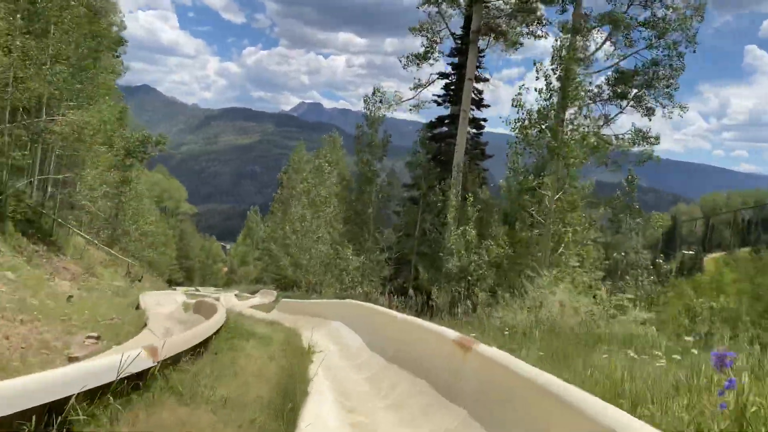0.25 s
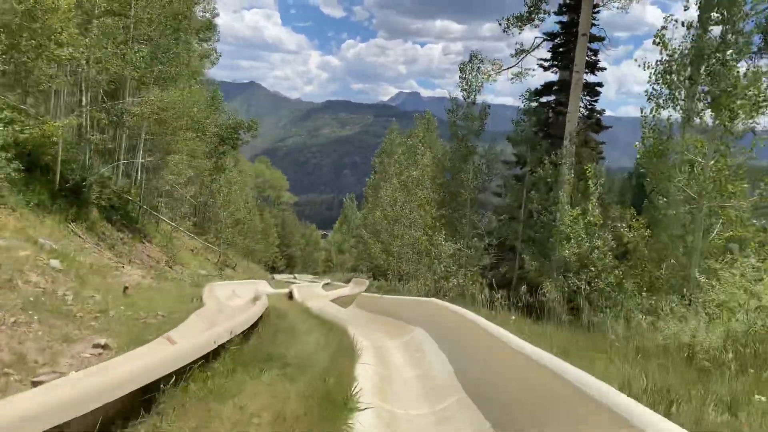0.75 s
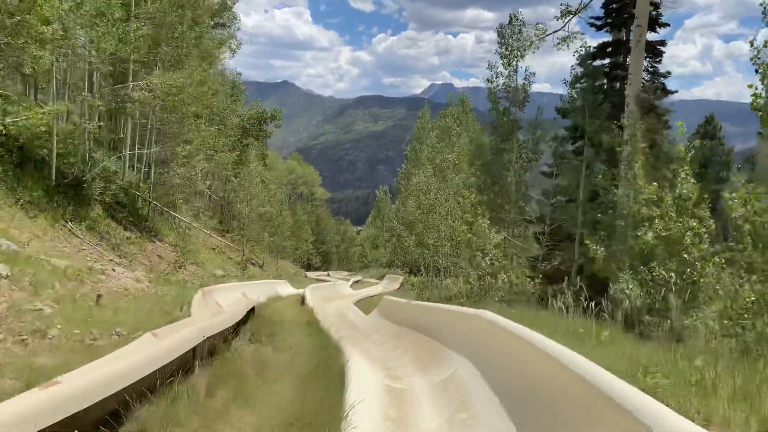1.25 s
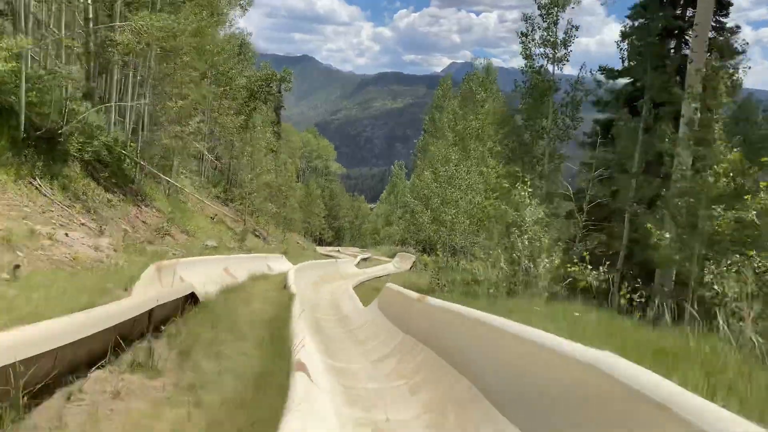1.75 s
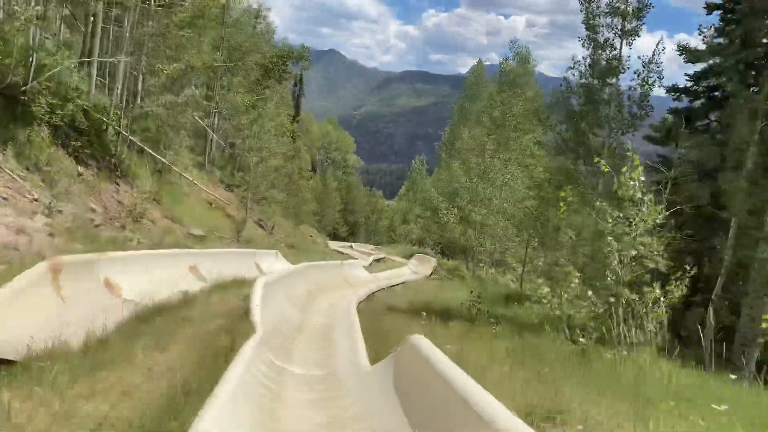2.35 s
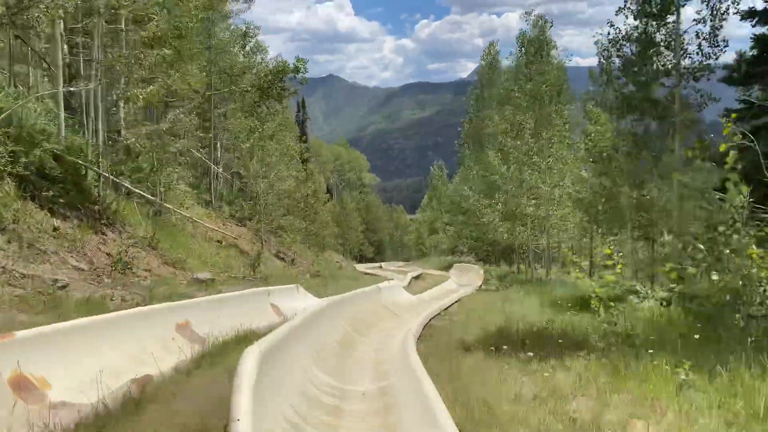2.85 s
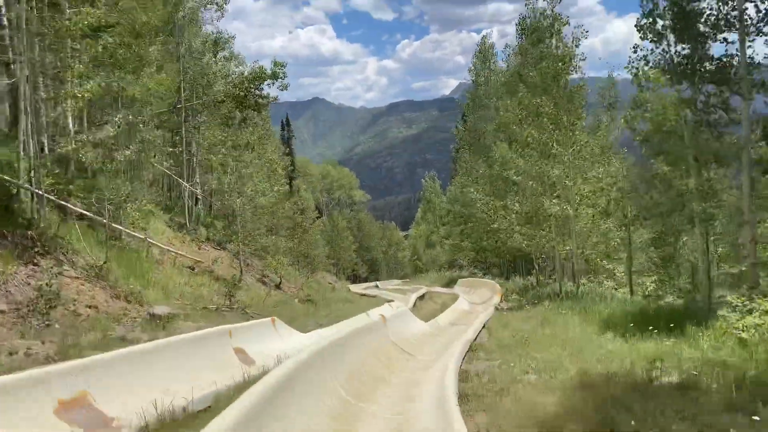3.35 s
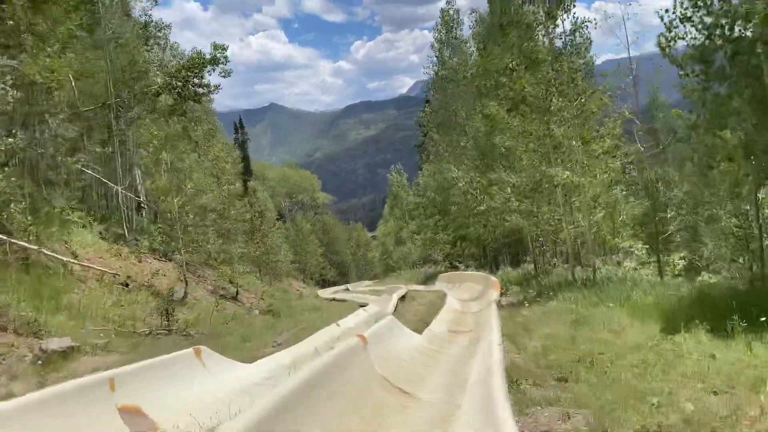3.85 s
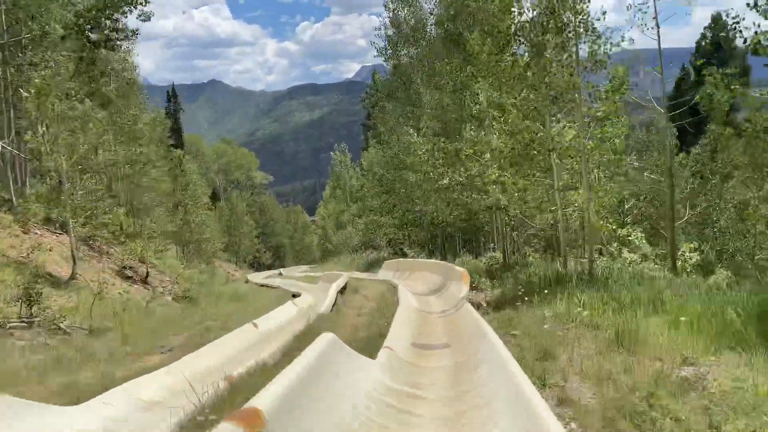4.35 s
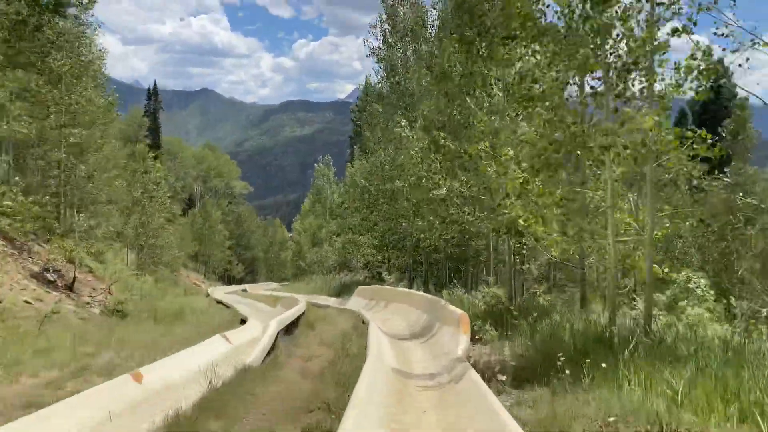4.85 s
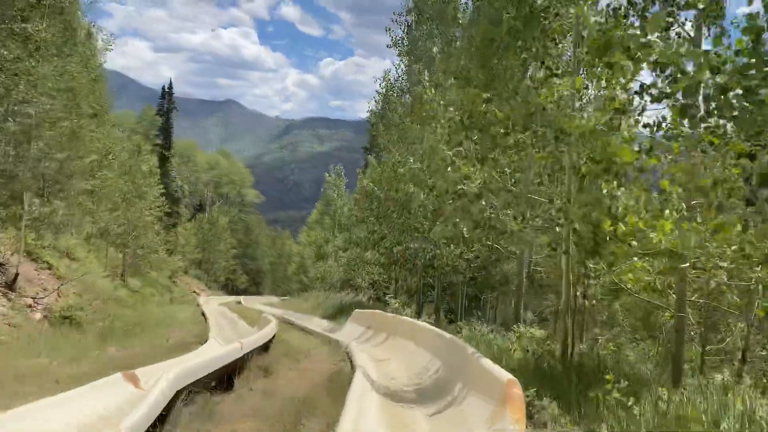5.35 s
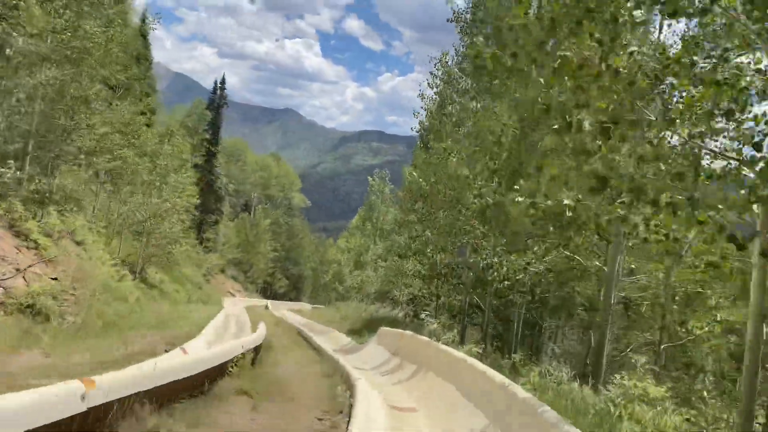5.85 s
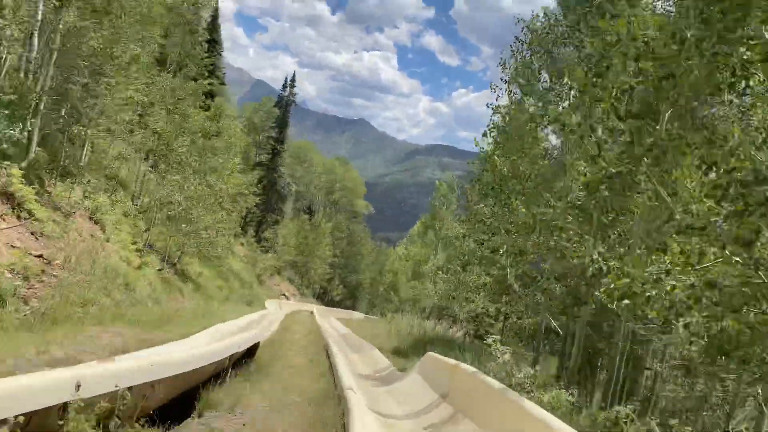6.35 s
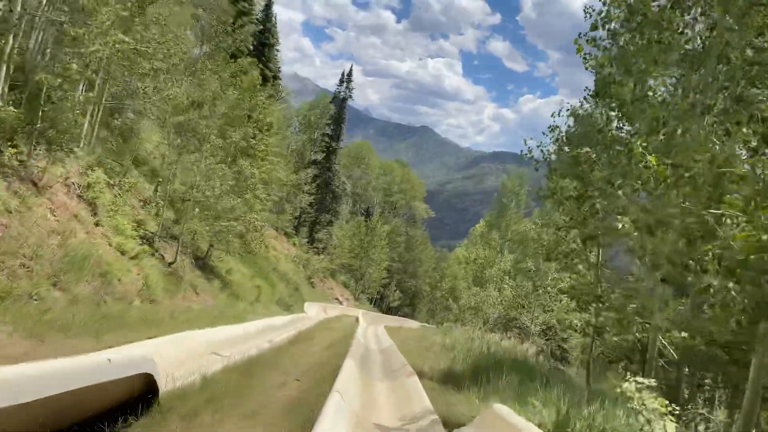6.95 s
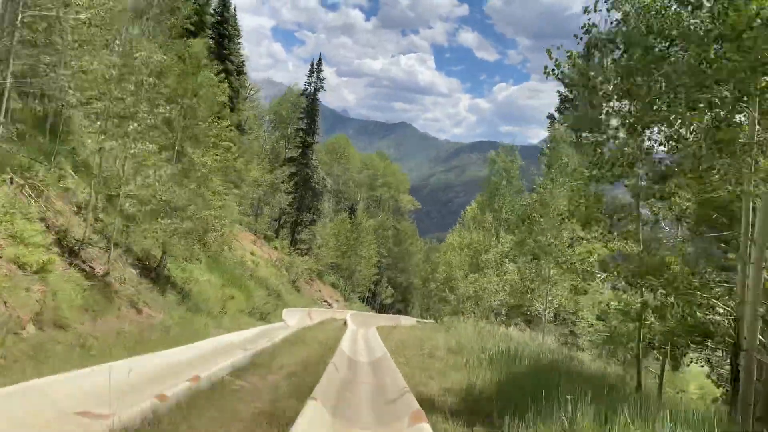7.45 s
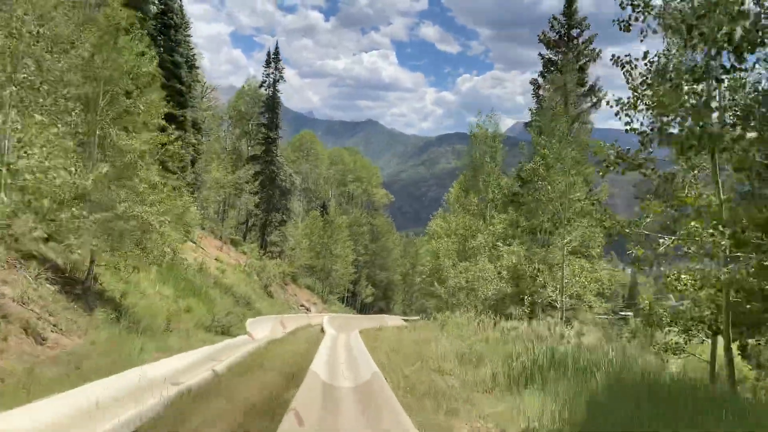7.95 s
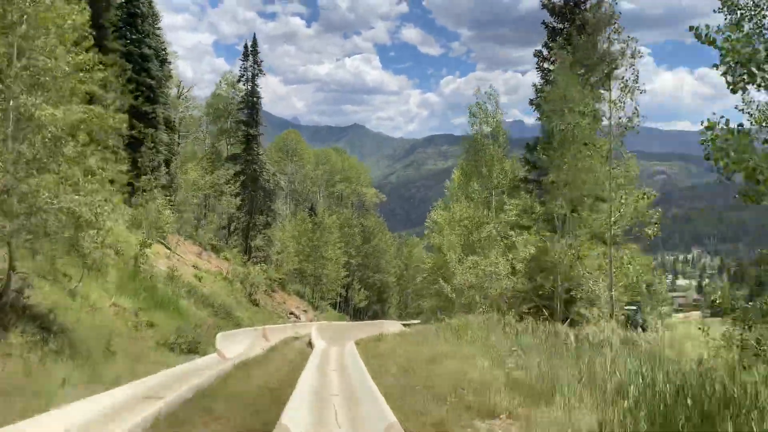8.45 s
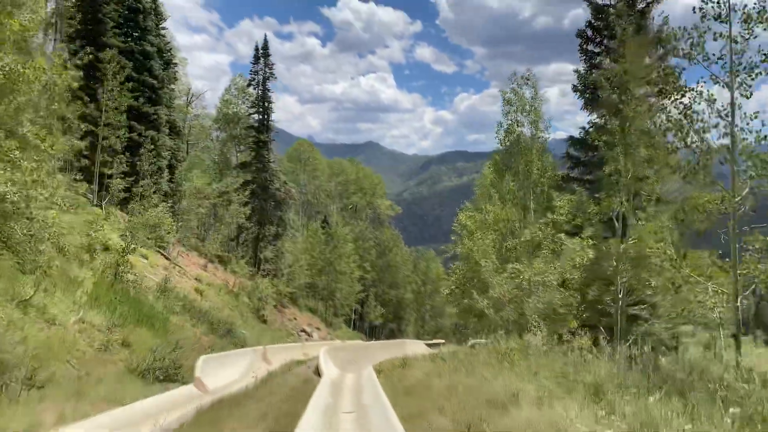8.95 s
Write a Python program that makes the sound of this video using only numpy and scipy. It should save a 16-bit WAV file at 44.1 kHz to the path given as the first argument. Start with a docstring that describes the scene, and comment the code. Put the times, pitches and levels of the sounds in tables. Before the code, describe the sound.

Close, continuous rolling rumble of a wheeled sled in a hard chute, broken by clacks, deep thumps, brief scrapes and faint hiss.

```python
"""A wheeled plastic sled rumbles down a trough track: track grain drives resonances of trough, tub and frame,
and uneven wheel rims add a drone of harmonics that climbs with the turning rate.
Seams, knocks and bumps are bursts of chattering contacts rung through the same parts, with rattles between.
Short accents sit on top: low swells, scrapes, seat tocks, fitting clinks and grit snaps.
Wheel hiss and rushing air are flickering bands of noise; a limiter holds the peaks."""
import sys
import numpy as np
from scipy import signal
from scipy.io import wavfile
from scipy.ndimage import uniform_filter1d, minimum_filter1d

SR = 44100
rng = np.random.default_rng(int(sys.argv[2]) if len(sys.argv) > 2 else 0)


def store_wav(level_fs):
    """Save 16-bit WAV to argv[1]."""
    pcm = np.round(np.clip(np.atleast_2d(level_fs), -1, 1) * 32767)
    wavfile.write(sys.argv[1], SR, pcm.T.astype(np.int16))


N = 405715

# Tables of resonances and spectra hold relative levels; layer and blow levels are before trims.
# rolling on plain track: t/s, trough boom level/dB, tub drumming level/dB, frame clatter level/dB
ROLLING_LEVELS = [(0.0, -34, -30, -29), (0.25, -33.5, -39, -31.5), (0.75, -32, -31, -27.5),
                  (1.08, -26, -29, -29), (1.85, -25.5, -31, -29.5), (2.25, -19.5, -26, -31),
                  (2.72, -34, -35.5, -30), (2.98, -21, -25.5, -25), (3.2, -30, -24.5, -27.5),
                  (3.45, -23.5, -25.5, -21), (4.05, -27.5, -30.5, -31.5), (4.6, -25.5, -18, -24.5),
                  (5.65, -23.5, -17.5, -26), (6.12, -25.5, -19.5, -23.5), (6.45, -19.5, -17, -23.5),
                  (7.2, -28, -19, -25), (7.88, -24.5, -16, -23), (8.13, -31.5, -17, -25.5),
                  (8.5, -21, -17, -23.5), (9.2, -26, -15, -26)]
# treble bed: t/s, wheel hiss level/dB, rushing air level/dB
TREBLE_LEVELS = [(0.0, -39.5, -62.5), (0.8, -39.5, -61.5), (0.92, -40, -66.5), (1.25, -40, -61.5),
                 (2.5, -38, -62), (2.7, -39, -67), (3.7, -38.5, -62.5), (4.5, -43, -64.5), (5.2, -43, -70),
                 (5.65, -43.5, -69), (6.45, -38.5, -61), (7.15, -37.5, -63.5), (8.2, -43, -70),
                 (9.2, -41, -68.5)]
BOOM_TRIM_DB, DRUM_TRIM_DB, CLATTER_TRIM_DB, HISS_TRIM_DB, AIR_TRIM_DB = 0, 1, -1.5, -1, 11
# wheels: t/s, turning rate/(turns per s), drone level over drumming/dB, tub brightness/(dB per octave)
WHEELS = [(0, 18.7, -8.5, 11), (1.4, 18.8, 2.5, 1), (2.3, 20.7, -7.5, -0.5), (3.4, 21.2, -3, 6),
          (4.3, 21.2, -14.5, -3.5), (5.2, 22.6, -5.5, -4), (6.5, 23.1, -10, -3.5), (7.5, 23.0, -4.5, -2),
          (8.6, 24.2, -2, 4), (9.2, 22.4, 4.5, -0.5)]
# unevenness of the wheel rims: multiple of the turning rate (rounded for the tone), level/dB
RIM_HARMONICS = [(5, -3.5), (7, -8.5), (8, -3), (9, 2), (11, -11.5), (16, -9.5), (19, -2), (20, -4.5),
                 (21, -3.5), (22, -7)]
# the sled leans in the bends: t/s, rumble left minus right level/dB
LEAN_BALANCE = [(0.5, 1.5), (2.5, -3.5), (4.6, -4), (5.3, 1.5), (6.2, 0.5), (7.2, 0), (9.2, -1.5)]
# the bass draws to the centre below this pitch: t/s, f/Hz
BASS_CENTRE = [(1.3, 26), (1.8, 65), (2.1, 288), (2.6, 510), (4.6, 425), (5.1, 295), (5.6, 170), (6.1, 105),
               (7.0, 45)]

# rough track: start t/s, length t/s, rise of drumming level/dB, rise of clatter level/dB
ROUGH_STRETCHES = [(0.28, 0.193, 16, 7), (0.487, 0.12, 10.5, 6.5), (1.291, 0.31, 5, 4.5),
                   (2.044, 0.12, 6, 3), (2.425, 0.41, 5, 3.5), (4.128, 0.21, 12.5, 8.5),
                   (4.364, 0.061, 8.5, 3), (4.74, 0.74, 3, 2), (5.853, 0.17, 3, 4.5), (6.736, 0.19, 2, 1),
                   (7.19, 0.19, 5.5, 6), (7.85, 0.095, 3.5, 3)]
# the sled goes light over a crest and the rolling drops: start t/s, length t/s, drop in level/dB
LIGHT_CRESTS = [(0.883, 0.033, 5), (1.76, 0.059, 5), (2.117, 0.042, 8), (3.181, 0.059, 5.5),
                (5.731, 0.016, 5), (6.068, 0.052, 5), (8.209, 0.075, 3.5)]
STRETCH_ATTACK_S, STRETCH_RELEASE_S = 0.012, 0.028  # shared by rough stretches and crests
BOOM_FOLLOWS, HISS_FOLLOWS, AIR_FOLLOWS = 0.48, 0.69, 0.19  # shares of the clatter's rise or drop

# resonances of the track's trough: f/Hz, width f/Hz, level/dB
TROUGH_MODES = [(60.7, 20, 3.5), (82.5, 29.4, 8.5), (108.7, 26.8, 5)]
# resonances of the sled's tub: f/Hz, width f/Hz, level/dB
TUB_MODES = [(154.2, 33, 1.5), (217.3, 54.2, 4), (249.4, 60, -5.5), (348.7, 61.5, 0.5), (387.2, 93, -4),
             (504, 235, -12.5)]
# broad resonances of the frame: f/Hz, width f/Hz, level/dB
FRAME_MODES = [(559, 166, 12), (741.6, 180, 13.5), (908, 246, 9.5), (1127, 394, -0.5), (1638, 304, 3.5),
               (1900, 280, -10), (2130, 880, -13)]
# narrow frame resonances, singing after a knock or a wheel scuff: f/Hz, width f/Hz, level/dB
SCUFF_MODES = [(741, 62, 0), (848, 43, 1.5), (936, 29, -7), (1099, 56, -2), (1250, 110, -6),
               (1526, 70, -7.5), (1730, 52, -22), (1874, 76, -8.5), (2132, 103, -13)]
SCUFF_DB = -5.5  # relative to the grain in the clatter
# resonances of the axles: f/Hz, width f/Hz, level/dB
AXLE_MODES = [(2700, 450, 1), (3550, 700, 2), (4700, 1400, -4.5), (6400, 2600, -11), (10500, 4000, -22)]
# a hollow in the rolling sound: depth 0-1 at the slowest speed, depth lost per added turn per s
HOLLOW_HZ, HOLLOW_WIDTH_HZ, HOLLOW_DEPTH, HOLLOW_FILLS = 563, 100, 0.78, 0.31

# the sled knocks against the trough: t/s, clatter level/dB, tick level/dB, thump level/dB,
# rattling time t/s, brightness/(dB per octave)
TROUGH_KNOCKS = [(.29, -19.5, -35, -23.5, 0.016, -5), (.32, -16, -30, -14.5, 0.018, -2),
                 (.399, -15.5, -27.5, -24, 0.011, 2), (.433, -19, -42, -24, .004, 3),
                 (.549, -13, -31, -22, 0.017, -3), (.674, -24.5, -38.5, -49, 0.012, 2),
                 (.857, -18, -41, -23, 0.0093, -6), (1.346, -17.5, -46, -22, 0.0064, -10),
                 (1.358, -18.5, -35, -22, 0.03, 1), (1.657, -9.5, -39, -13, 0.029, -9),
                 (1.669, -10.5, -22.5, -13, 0.022, 5), (2.213, -12.5, -31, -14, 0.073, 2),
                 (2.626, -4, -29, 0, 0.012, -2.5), (3.237, -23, -45, -27, 0.0059, -2),
                 (3.315, -15, -30, -9.5, 0.02, 2), (3.426, -25, -47, -26, 0.015, 7),
                 (3.748, -22.5, -32, -20, .005, 4), (3.848, -22, -31, -10, 0.0046, 11),
                 (3.859, -12.5, -27, -9.5, 0.048, 0.5), (4.18, -12.5, -28, -16, 0.0057, -2),
                 (4.333, -20, -33, -10, 0.016, 5), (4.795, -15, -27.5, -18, 0.009, 0),
                 (5.318, -14, -31, -13, 0.029, 8), (6.297, -26, -43, -39, 0.0081, 12),
                 (6.543, -22, -41, -30, 0.011, 0), (6.773, -20, -44, -27, 0.019, -4),
                 (6.927, -14, -41, -18, 0.022, -8), (7.286, -11, -39, -11, 0.013, -7),
                 (7.312, -19, -46, -23, 0.017, -4), (8.35, -22, -39.5, -16, 0.012, 5),
                 (8.39, -14, -31.5, -20, 0.018, 4), (8.867, -17.5, -54, -31, 0.011, -2)]
# track seams under the front wheels, then the rear: t/s, clatter level/dB, tick level/dB,
# thump level/dB, rear minus front level/dB
TRACK_SEAMS = [(.99, -22.5, -46, -23.5, -12), (1.486, -10, -27, -15, -8), (2.196, -15, -22.5, -10.5, 1),
               (2.711, -20, -31, -13, -5.5), (3.786, -20.5, -28.5, -17.5, -8),
               (6.362, -13, -30, -10.5, -2.5), (7.224, -26, -44, -10, -17), (7.362, -16.5, -33, -16.5, 1),
               (7.842, -24, -39.5, -16.5, 3.5)]
REAR_LAG_S, SEAM_RATTLE_S = .059, 0.015
GRAZE_LEAD_S, GRAZE_DB = .011, -14.5  # a light graze leads every clack, this much under the listed clatter
CLACK_TRIM_DB, RING_TRIM_DB, TICK_TRIM_DB = -3.5, -11, -3
# soft bumps that shake the whole sled: t/s, trough boom level/dB, tub drumming level/dB
SOFT_BUMPS = [(0.335, -31, -19.5), (0.559, -18.5, -17.5), (1.5, -21, -12), (1.557, -18, -17.5),
              (1.688, -7, -15.5), (2.251, -5, -13), (2.905, -23, -38), (2.96, -20, -22), (3.876, -7.5, -7),
              (4.132, -21, -11.5), (4.226, -25, -9.5), (4.285, -27, -12.5), (4.766, -34, -12),
              (4.84, -28, -15), (4.942, -22, -10), (5.033, -24, -17.5), (5.165, -16.5, -15),
              (5.799, -29, -17.5), (5.966, -32, -10.5), (6.025, -26, -19.5), (6.458, -15.5, -23),
              (6.845, -38, -9.5), (7.0, -21, -16.5), (7.426, -18.5, -27)]
THUMP_BOOM_DB, DRUM_BLOW_TRIM_DB = -12.5, -0.94  # thump reaching the trough; trim of all drum blows
THUMP_S, BUMP_S = 0.019, 0.023  # shaking times
# rattles: rate at full speed, level relative to the untrimmed clatter, random spread, decay
RATTLES_PER_S, RATTLE_DB, RATTLE_SPREAD_DB, RATTLE_S = 12, -6, 1.5, 0.0032

# low tones swell under the wheels, from the track or the turning rims:
# start t/s, length t/s, first f/Hz, last f/Hz, level/dB
LOW_SWELLS = [(4.2, 0.18, 275, 241.2, -16.5), (4.78, 0.55, 194.8, 155.2, -17),
              (5.29, 0.16, 240.3, 214.3, -19), (5.501, .28, 111.3, 109.6, -22),
                (8.41, 0.8, 480, 461.3, -24.5)]
SWELL_WIDTH, SWELL_EDGE_S = .19, 0.043  # width as a share of the first pitch; time to rise and to fall
# runners scrape the trough wall: start t/s, length t/s, first f/Hz, last f/Hz, level/dB
WALL_SCRAPES = [(0.503, 0.055, 1650, 1800, -26.5), (0.791, .06, 1346, 1134, -36),
                (.96, 0.05, 1800, 1710, -36.5), (1.049, 0.079, 709, 733, -30),
                (1.252, 0.053, 762, 822, -32), (2.018, 0.092, 765, 907, -32),
                (2.909, 0.049, 1920, 2040, -34), (2.999, .11, 1100, 1050, -36),
                (3.435, 0.1, 1640, 1810, -34), (3.856, 0.052, 2310, 2200, -25.5),
                (6.724, 0.11, 1600, 1660, -34), (6.763, 0.13, 776, 722, -28)]
SCRAPE_WIDTH, SCRAPE_RELEASE_S = 0.15, 0.022  # width as a share of the first pitch; fade at the end
SCRAPE_CATCHES_PER_S, SCRAPE_CATCH_DB = 197, 6.5  # the runner catches unevenly as it slides
# hollow tocks of the seat shell: t/s, level/dB
SEAT_TOCKS = [(4.329, -20.5), (5.319, -16), (8.391, -21)]
# resonance of the seat shell: f/Hz, width f/Hz, level/dB
SEAT_MODES = [(622, 106, 0)]
# a loose metal fitting hits its stop: t/s, knock of the stop level/dB, ring of the fitting level/dB
FITTING_CLINKS = [(.434, -32, -54), (.538, -27, -56), (1.669, -23, -38), (2.198, -24, -39),
                  (2.255, -20, -35), (2.773, -35, -37), (3.317, -25.5, -32), (3.869, -29, -51),
                  (6.425, -33, -47), (8.393, -23.5, -48), (8.867, -26, -33)]
# resonances of the stop: f/Hz, width f/Hz, level/dB
STOP_MODES = [(1690, 250, 2.5), (2130, 330, -4.5)]
# resonance of the loose fitting: f/Hz, width f/Hz, level/dB
FITTING_MODES = [(4630, 780, 18)]
# bits of grit crack under a wheel: t/s, level/dB
GRIT_SNAPS = [(1.063, -43), (1.546, -39), (1.556, -38), (2.254, -33), (3.237, -48), (3.847, -34),
              (3.858, -37), (5.289, -40), (5.369, -48), (5.4, -44), (7.336, -45)]
# resonances of the cracking grit: f/Hz, width f/Hz, level/dB
SNAP_MODES = [(6050, 6100, 3.5), (10600, 3800, -4)]

# spectrum of the wheel hiss: f/Hz, level/(dB per Hz)
HISS_SPECTRUM = [(2000, 8), (2600, 1), (3500, 2.5), (4800, -0.5), (6200, -4), (8000, -10), (10000, -42),
                 (14000, -37)]
# spectrum of the rushing air: f/Hz, level/(dB per Hz)
AIR_SPECTRUM = [(4000, -12), (7500, -3), (10500, 0), (12000, -1), (13500, -15), (16000, -13)]
# stereo width by pitch: f/Hz, left-right likeness
STEREO_LIKENESS = [(60, -0.15), (300, 0.27), (560, -0.37), (800, 0.11), (1200, 0.67), (1750, 0.29),
                   (2600, -0.85), (3500, -0.23), (4600, 0.57), (6000, -0.37), (11000, 0.24)]
# stereo balance by pitch: f/Hz, left minus right level/dB
STEREO_BALANCE = [(350, 0), (600, 2), (1000, -3), (1400, -2), (2100, -4), (3000, -0.5), (4800, 2),
                  (8000, 1), (11000, 0)]
CUTOFF_HZ = 16700


def from_db(db):
    """Decibels to gain."""
    return np.exp(np.asarray(db) * (np.log(10) / 20))


def rms_one(x):
    """Scale to unit power."""
    return x / np.sqrt(np.mean(x ** 2) + 1e-20)


def in_time(rows):
    """Each column of a curve at every sample."""
    s, *columns = np.transpose(rows)
    return [np.interp(np.arange(N) / SR, s, c) for c in columns]


def at_hz(points, hz):
    """Read a spectrum on a log-frequency axis."""
    point_hz, values = np.transpose(points)
    return np.interp(np.log(hz), np.log(point_hz), values)


def drift(rate):
    """Slow chance with spread 1, wandering faster at a higher rate."""
    r = np.exp(-80 * np.pi * rate / SR)  # computed at every 40th sample
    noise = rng.standard_normal(N // 40 + 2002)
    slow = signal.lfilter([1], [1, -2 * r, r * r], noise)[2000:]
    return np.interp(np.arange(N) / 40, np.arange(len(slow)), rms_one(slow))


def resonate(x, hz, width_hz):
    """A resonance with steep skirts."""
    edges = np.clip([hz - width_hz / 2, hz + width_hz / 2], [10, 20], [.44 * SR, .45 * SR])
    return signal.sosfilt(signal.butter(2, edges, "band", fs=SR, output="sos"), x + 1e-18)


def to_ears(pair, hz, centred_hz=0):
    """Two unrelated motions make a stereo pair set by pitch, drawn to the centre below centred_hz."""
    wide = 1 / (1 + (centred_hz / hz) ** 8)
    unlike = (1 - np.clip(at_hz(STEREO_LIKENESS, hz), -.99, 1)) * wide
    mid = np.sqrt(2 - unlike) * pair[0]
    side = np.sqrt(unlike) * pair[1]
    balance = from_db(at_hz(STEREO_BALANCE, hz) / 2)
    return np.array([(mid + side) * balance, (mid - side) / balance])


def body(force, modes, colour_db, centred_hz):
    """Up-down and sideways forces ring a part's resonances, each coloured by colour_db(hz)."""
    out = 0
    for hz, width, db in modes:
        ringing = to_ears(resonate(force, hz, width), hz, centred_hz)
        out = out + from_db(db + colour_db(hz)) * ringing
    return out


def grit(per_s, spread_db, size):
    """Random tiny contacts of random strength and sign, in two directions."""
    strength = from_db(spread_db * np.minimum(rng.exponential(1, (2, size)), 4))
    hits = rng.random((2, size)) < per_s / SR
    return hits * strength * rng.choice([-1, 1], (2, size))


def rolling(modes, per_s, spread_db, even_s, judder_db, patchy_db, tilt=0, centred_hz=0):
    """Track grain shakes a part with shifting colour; the sum is evened to a steady level, then judders."""
    def colour_db(hz):
        return patchy_db * drift(16.0) + tilt * np.log2(hz / modes[0][0])

    sound = body(grit(per_s, spread_db, size=N), modes, colour_db, centred_hz)
    power = uniform_filter1d(np.mean(sound ** 2, axis=0), max(int(even_s * SR), 2))
    even = sound / np.sqrt(np.abs(power) + 1e-12)
    return rms_one(even * from_db(judder_db * drift(23.0)))


def blows(times, levels_db, lengths_s, modes, rise_s, first_db, vary_db, tilt, centred_hz):
    """Each blow is a first contact and a dying chatter of rebounds, rung through a part."""
    size, window = SR // 7, SR // 30  # longest ring; opening span that sets the level
    t = np.arange(size) / SR
    chatter = np.array([grit(1400, 3.8, size=size) for s in times])
    fade = np.exp(-t / np.maximum(lengths_s, 1e-3)[:, None]) * (1 - np.exp(-t / rise_s))
    force = chatter * fade[:, None]
    force /= np.sqrt(np.sum(force ** 2, axis=2, keepdims=True)) + 1e-12
    force[:, 0, 0] += from_db(first_db)  # the first contact comes from straight below

    def colour_db(hz):
        per_blow = vary_db * rng.standard_normal(len(times)) + tilt * np.log2(hz / modes[0][0])
        return np.repeat(per_blow, size)

    # the blows pass through the part end to end, then are laid out in time
    centred_hz = np.repeat(centred_hz * np.ones(len(times)), size)
    rung = body(np.hstack(force), modes, colour_db, centred_hz).reshape(2, len(times), size)
    out = np.zeros((2, N + size))
    for k, (s, db) in enumerate(zip(times, levels_db)):
        at = max(int(s * SR), 0)
        out[:, at:at + size] += from_db(db) * rung[:, k] / np.std(rung[:, k, :window])
    return out[:, :N]


def glide(first_hz, last_hz, width, size):
    """Smoothed noise in one resonance whose pitch slides; width is a share of the first pitch."""
    smooth = signal.butter(2, width * first_hz / 2, fs=SR, output="sos")
    grain = signal.sosfilt(smooth, rng.standard_normal((2, 2, size + SR // 4)))[..., -size:]
    phase = 2 * np.pi * np.cumsum(np.linspace(first_hz, last_hz, size)) / SR
    return np.real((grain[0] + 1j * grain[1]) * np.exp(1j * phase))


def stretches(starts, lengths):
    """Each stretch of track sets in quickly, holds and lets go: one row of 0-1 per stretch."""
    t = np.arange(0, N, 40) / SR
    rows = []
    for s, hold in zip(starts, lengths):
        attack = (t - s) / STRETCH_ATTACK_S
        release = 1 + (s + hold - t) / STRETCH_RELEASE_S
        rows.append(np.clip(np.minimum(attack, release), 0, 1))
    return np.array(rows)


def rough_rise():
    """Rough stretches raise the drumming and the clatter, crests lower both: dB at every sample."""
    start, length, drum_db, clatter_db = np.transpose(ROUGH_STRETCHES)
    crest_start, crest_length, drop_db = np.transpose(LIGHT_CRESTS)
    rough = stretches(start, length)
    drop = drop_db @ stretches(crest_start, crest_length)
    return [np.interp(np.arange(N), np.arange(0, N, 40), db @ rough - drop) for db in (drum_db, clatter_db)]


def hiss(spectrum, flicker_db):
    """Bright noise in bands that each flicker a little."""
    edges = np.geomspace(1900, 16500, 11)
    white, out = rng.standard_normal((2, 2, N)), 0
    for k, (low, high) in enumerate(zip(edges, edges[1:])):
        hz = (low + high) / 2
        gain = from_db(at_hz(spectrum, hz) + flicker_db * drift(24))
        out = out + gain * to_ears(resonate(white[k % 2], hz, high - low), hz)
    return rms_one(out)


def rushing_air():
    """Rushing air is flickering high noise that follows the rough track slightly."""
    level_db = in_time(TREBLE_LEVELS)[1] + AIR_FOLLOWS * rough_rise()[1] + AIR_TRIM_DB
    return from_db(level_db) * hiss(AIR_SPECTRUM, flicker_db=2.5)


def wheel_hiss():
    """The wheels hiss as flickering treble noise that swells on rough track."""
    level_db = in_time(TREBLE_LEVELS)[0] + HISS_FOLLOWS * rough_rise()[1] + HISS_TRIM_DB
    return from_db(level_db) * hiss(HISS_SPECTRUM, flicker_db=3.0)


def snaps():
    """Grit breaks with a tiny, very bright crack."""
    s, db = np.transpose(GRIT_SNAPS)
    return blows(s, db, np.full(len(s), .003), SNAP_MODES,
                 rise_s=.0003, first_db=-6, vary_db=2, tilt=0, centred_hz=0)


def clinks():
    """The loose fitting, near the centre, knocks on its stop and rings briefly."""
    s, knock_db, ring_db = np.transpose(FITTING_CLINKS)
    knock = blows(s, knock_db, np.full(len(s), .005), STOP_MODES,
                  rise_s=0.00028, first_db=0, vary_db=5.0, tilt=0, centred_hz=1980)
    ring = blows(s, ring_db, np.full(len(s), .002), FITTING_MODES,
                 rise_s=.0003, first_db=3, vary_db=1, tilt=0, centred_hz=6000)
    return knock + ring


def tocks():
    """A jolt knocks the seat shell, which answers at one hollow resonance."""
    s, db = np.transpose(SEAT_TOCKS)
    return blows(s, db, np.full(len(s), .012), SEAT_MODES,
                 rise_s=.001, first_db=0, vary_db=0, tilt=0, centred_hz=650)


def scrapes():
    """A runner rubs the wall: grain drives one gliding resonance, swelling until the contact breaks."""
    out = np.zeros((2, N))
    for s, length, first_hz, last_hz, db in WALL_SCRAPES:
        t = np.arange(int(length * SR)) / SR
        sung = glide(first_hz, last_hz, SCRAPE_WIDTH, size=len(t))
        swell = np.sqrt(t / length) * np.minimum((length - t) / SCRAPE_RELEASE_S, 1)
        catches = np.interp(t * SCRAPE_CATCHES_PER_S, np.arange(64), rng.standard_normal(64))
        swell *= from_db(SCRAPE_CATCH_DB * catches)
        at = int(s * SR)
        out[:, at:at + len(t)] += from_db(db) * rms_one(to_ears(sung, first_hz, first_hz) * swell)
    return out


def low_swells():
    """Low tones swell under the wheels, from the track or the turning rims, each sliding in pitch."""
    out = np.zeros((2, N + SR))
    for s, length, first_hz, last_hz, db in LOW_SWELLS:
        t = np.arange(int(length * SR)) / SR
        centred_hz = np.interp(s, *np.transpose(BASS_CENTRE))
        sung = glide(first_hz, last_hz, SWELL_WIDTH, size=len(t))
        edges = np.minimum(np.minimum(t, length - t) / SWELL_EDGE_S, 1)
        at = int(s * SR)
        out[:, at:at + len(t)] += from_db(db) * rms_one(to_ears(sung, first_hz, centred_hz) * edges)
    return out[:, :N]


def rattles():
    """Loose frame parts tap at random, more often as the wheels speed up and louder on rough track."""
    chance = rng.random((160, 2))  # candidate taps: place in time, luck
    s = chance[:, 0] * N / SR
    at = (chance[:, 0] * N).astype(int)
    turns = in_time(WHEELS)[0]
    pace = (turns[at] / turns.max()) ** 3
    taps = chance[:, 1] < pace * RATTLES_PER_S * N / SR / len(s)
    clatter_db = (in_time(ROLLING_LEVELS)[2] + rough_rise()[1])[at]
    db = clatter_db + RATTLE_DB + RATTLE_SPREAD_DB * rng.standard_normal(len(s))
    return blows(s[taps], db[taps], np.full(taps.sum(), RATTLE_S), FRAME_MODES,
                 rise_s=0.00059, first_db=-4, vary_db=3.0, tilt=1.8, centred_hz=563)


def contacts():
    """All hard contacts, each seam once per axle, in the columns of TROUGH_KNOCKS."""
    front, back = [], []
    for s, clatter, tick, thump, rear in TRACK_SEAMS:
        front.append((s, clatter, tick, thump, SEAM_RATTLE_S, 0))
        back.append((s + REAR_LAG_S, clatter + rear, tick + rear, thump + rear, SEAM_RATTLE_S, 0))
    return np.transpose(front + back + list(TROUGH_KNOCKS))


def knocks():
    """Hard contacts graze, then clack and ring in the frame and tick in the axles."""
    s, clatter_db, tick_db, _, rattle_s, brightness = contacts()
    graze = blows(s - GRAZE_LEAD_S, clatter_db + GRAZE_DB, rattle_s, FRAME_MODES,
                  rise_s=0.0028, first_db=-7, vary_db=2, tilt=-1.5, centred_hz=550)
    clack = blows(s, clatter_db + CLACK_TRIM_DB, rattle_s, FRAME_MODES,
                  rise_s=0.00049, first_db=-6, vary_db=4.5, tilt=brightness, centred_hz=514)
    ring = blows(s, clatter_db + RING_TRIM_DB, rattle_s, SCUFF_MODES,
                 rise_s=0.0005, first_db=6, vary_db=4, tilt=brightness, centred_hz=530)
    tick = blows(s, tick_db + TICK_TRIM_DB, 0.95 * rattle_s, AXLE_MODES,
                 rise_s=0.00015, first_db=-11.0, vary_db=4.0, tilt=-1.3, centred_hz=0)
    return graze + clack + ring + tick


def bumps():
    """Soft bumps and the thump of every hard contact swell in the tub and the trough under it."""
    thumps = [(s, thump_db + THUMP_BOOM_DB, thump_db, THUMP_S) for s, _, _, thump_db, _, _ in contacts().T]
    soft = [(*bump, BUMP_S) for bump in SOFT_BUMPS]
    s, boom_db, drum_db, shake_s = np.transpose(thumps + soft)
    centred_hz = np.interp(s, *np.transpose(BASS_CENTRE))
    boom = blows(s, boom_db, shake_s, TROUGH_MODES,
                 rise_s=0.0026, first_db=4.5, vary_db=-2.5, tilt=2.9, centred_hz=centred_hz)
    drum = blows(s, drum_db + DRUM_BLOW_TRIM_DB, shake_s, TUB_MODES,
                 rise_s=0.00051, first_db=-3.0, vary_db=0.0, tilt=0.47, centred_hz=centred_hz)
    return boom + drum


def wheel_drone(turns, centred_hz, slip, waver_db):
    """Two uneven wheels repeat their bumps at every turn, slipping slightly against each other."""
    rates = [turns * (1 + slip * drift(6.52)) for wheel in range(2)]
    angles = np.array([2 * np.pi * np.cumsum(rate) / SR for rate in rates], np.float32)
    out = 0
    for order, db in RIM_HARMONICS:
        phase = 2 * np.pi * rng.random((2, 1)).astype(np.float32)
        pair = np.sin(round(order) * angles + phase)
        out = out + from_db(db + waver_db * drift(6.9)) * to_ears(pair, order * np.mean(turns), centred_hz)
    return rms_one(out)


def frame_clatter(faster):
    """Track grain clatters in the frame, more bodily at speed; scuffs sing in its narrow resonances."""
    grain = rolling(FRAME_MODES, per_s=900, spread_db=-0.5, even_s=0.028, judder_db=1.9, patchy_db=2.5,
                    tilt=-.55 * faster)
    scuff = rolling(SCUFF_MODES, per_s=1500, spread_db=1.3, even_s=0.07, judder_db=2.5, patchy_db=4.5,
                    tilt=-.4 * faster)
    level_db = in_time(ROLLING_LEVELS)[2] + rough_rise()[1] + CLATTER_TRIM_DB
    return from_db(level_db) * rms_one(grain + from_db(SCUFF_DB) * scuff)


def tub_drumming(turns, drone_db, brightness, centred_hz):
    """Track grain drums the tub while the wheel rims drone through it, at one shared level."""
    drum = rolling(TUB_MODES, per_s=1500, spread_db=1.5, even_s=0.045, judder_db=2.5, patchy_db=2.5,
                   tilt=brightness, centred_hz=centred_hz)
    drone = from_db(drone_db) * wheel_drone(turns, centred_hz, slip=0.01168, waver_db=5.5)
    blend = (drum + drone) / np.sqrt(1 + from_db(drone_db) ** 2)
    level_db = in_time(ROLLING_LEVELS)[1] + rough_rise()[0] + DRUM_TRIM_DB
    return from_db(level_db) * blend


def trough_boom(faster, centred_hz):
    """Track grain booms in the trough, at higher pitches as the wheels turn faster."""
    boom = rolling(TROUGH_MODES, per_s=1700, spread_db=-4.0, even_s=0.086, judder_db=1.5, patchy_db=3.0,
                   tilt=5.4 * faster + 2, centred_hz=centred_hz)
    level_db = in_time(ROLLING_LEVELS)[0] + BOOM_FOLLOWS * rough_rise()[1] + BOOM_TRIM_DB
    return from_db(level_db) * boom


def hollow(x, turns):
    """A notch that fills in as the wheels speed up."""
    depth = np.clip(HOLLOW_DEPTH - HOLLOW_FILLS * (turns - turns.min()), 0, 1)
    notched = signal.lfilter(*signal.iirnotch(HOLLOW_HZ, HOLLOW_HZ / HOLLOW_WIDTH_HZ, fs=SR), x)
    return x + depth * (notched - x)


def ride():
    """Trough, tub and frame roll together; the rumble leans left and right."""
    turns, drone_db, brightness = in_time(WHEELS)
    lean_db = in_time(LEAN_BALANCE)[0]
    centred_hz = in_time(BASS_CENTRE)[0]
    faster = turns - np.mean(turns)
    rumble = trough_boom(faster, centred_hz) + tub_drumming(turns, drone_db, brightness, centred_hz)
    rumble = rumble * from_db(lean_db / 2 * np.array([[1], [-1]]))
    return hollow(rumble + frame_clatter(faster), turns)


def scene():
    """All layers mix dry, with no room around them."""
    bed = rushing_air() + wheel_hiss()
    accents = snaps() + clinks() + tocks() + scrapes() + low_swells()
    impacts = rattles() + knocks() + bumps()
    return bed + accents + impacts + ride()


def record(dry, release_db_per_s=50):
    """A limiter ducks the loudest peaks and recovers; the top is cut."""
    over = np.maximum(20 * np.log10(np.abs(dry).max(axis=0) / .97 + 1e-9), 0)
    ramp = release_db_per_s * np.arange(N) / SR
    duck = np.maximum.accumulate(over + ramp) - ramp
    # hold and smooth the gain over about 2 ms
    gain_db = uniform_filter1d(minimum_filter1d(-duck, size=89), size=89)
    top_cut = signal.cheby2(16, 70, CUTOFF_HZ, fs=SR, output="sos")
    return signal.sosfilt(top_cut, dry * from_db(gain_db))


dry = scene()
out = record(dry)
store_wav(out)
```